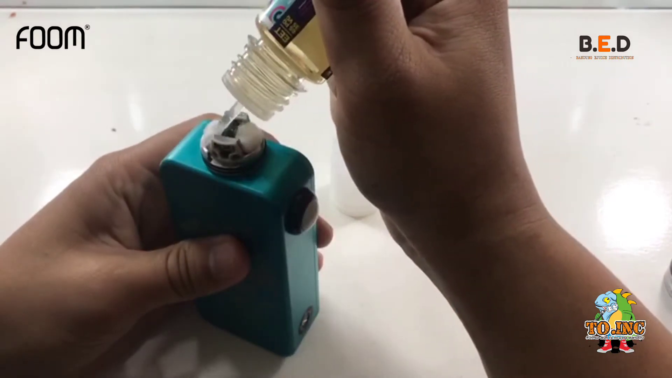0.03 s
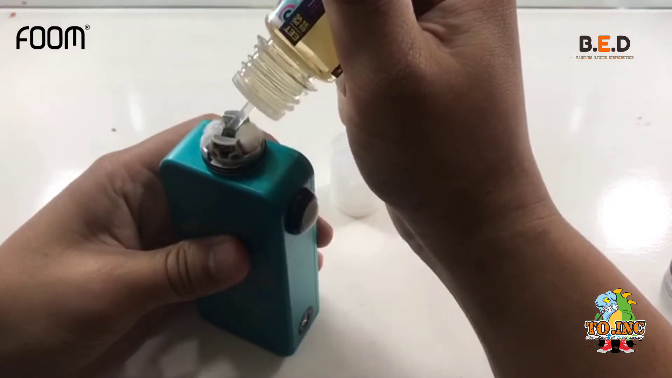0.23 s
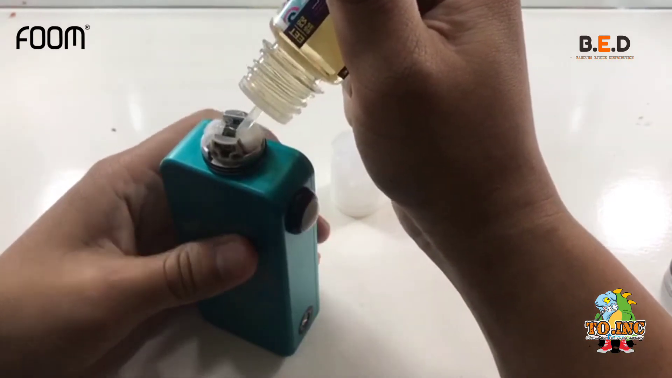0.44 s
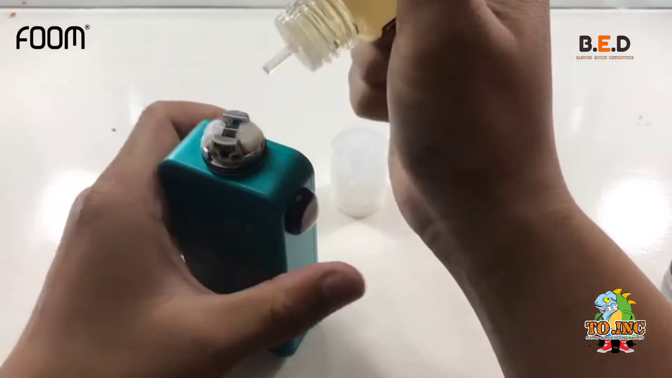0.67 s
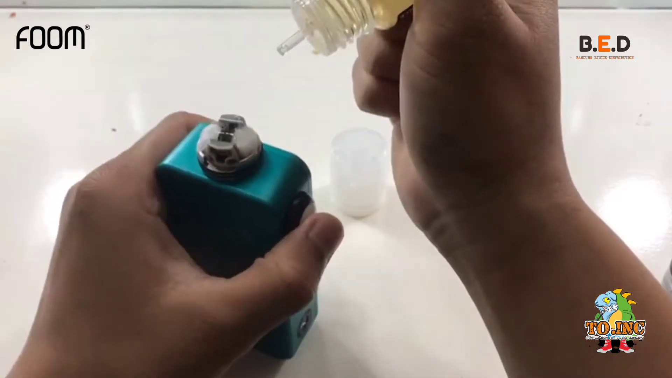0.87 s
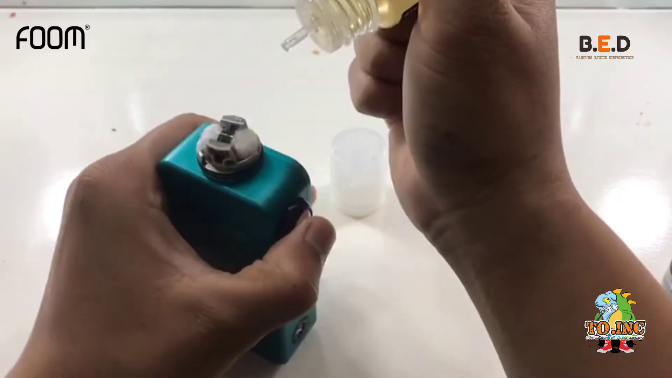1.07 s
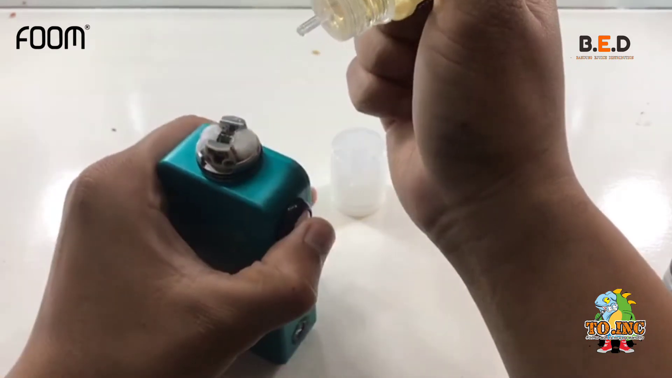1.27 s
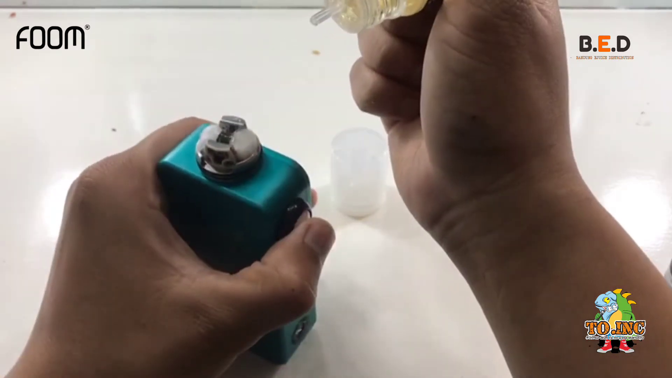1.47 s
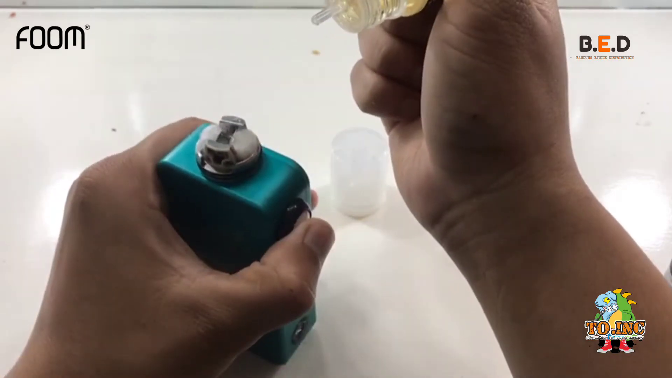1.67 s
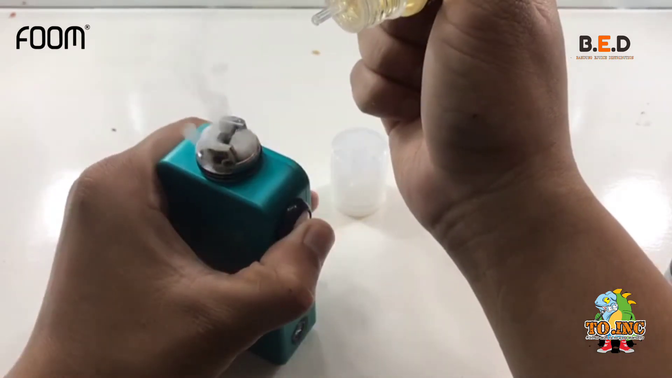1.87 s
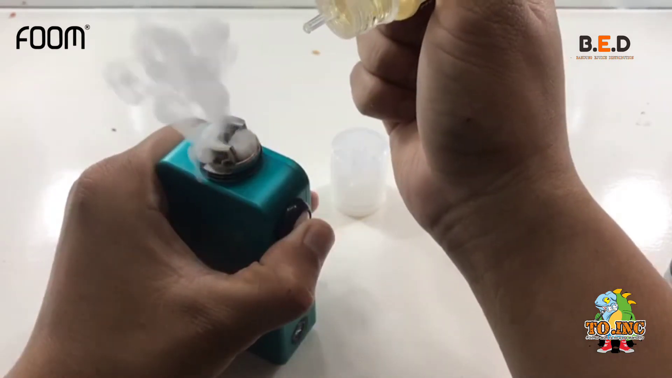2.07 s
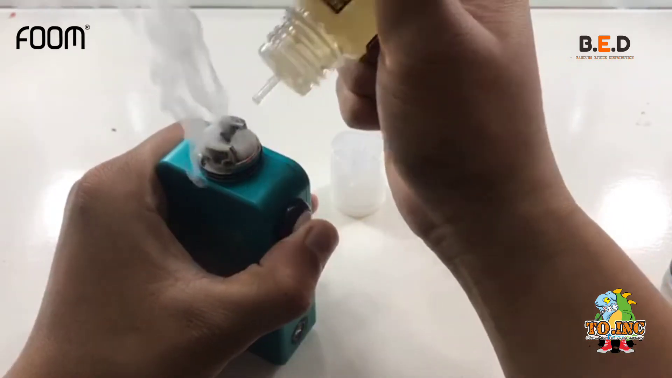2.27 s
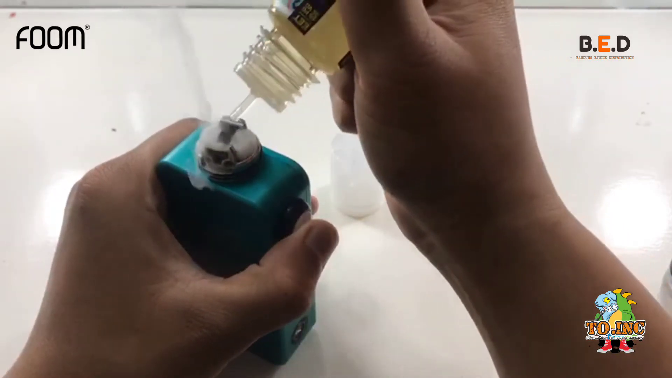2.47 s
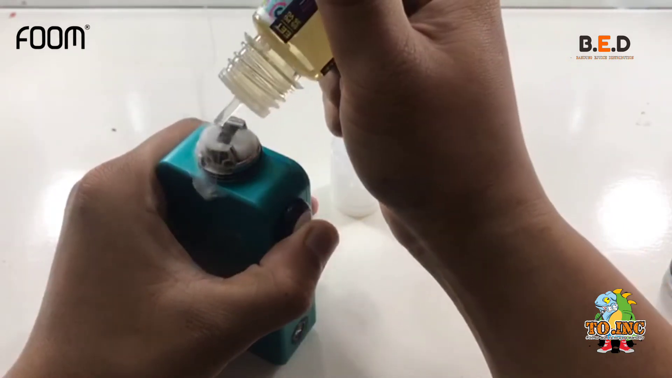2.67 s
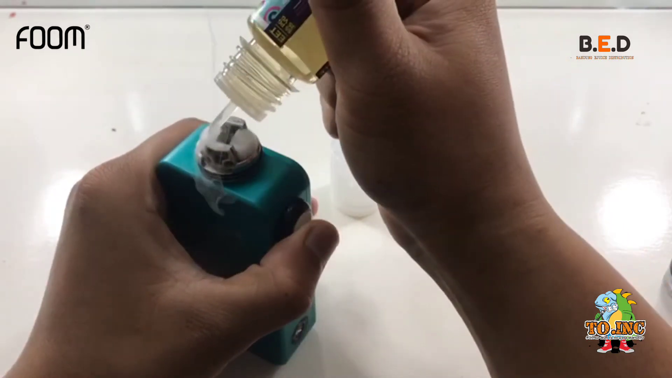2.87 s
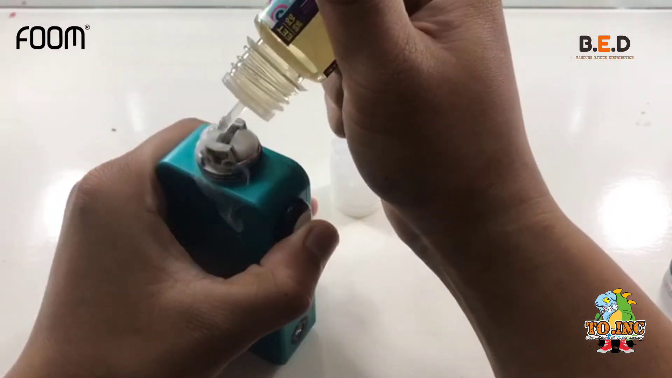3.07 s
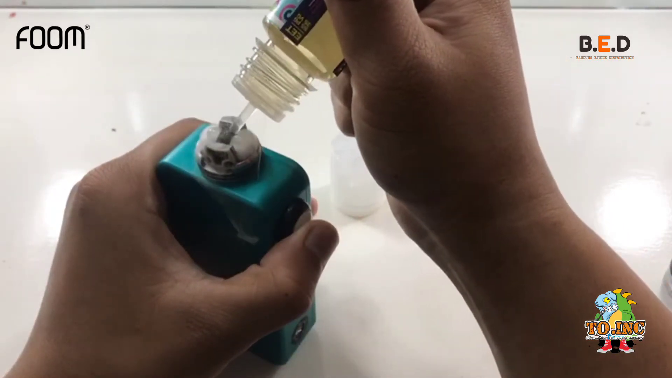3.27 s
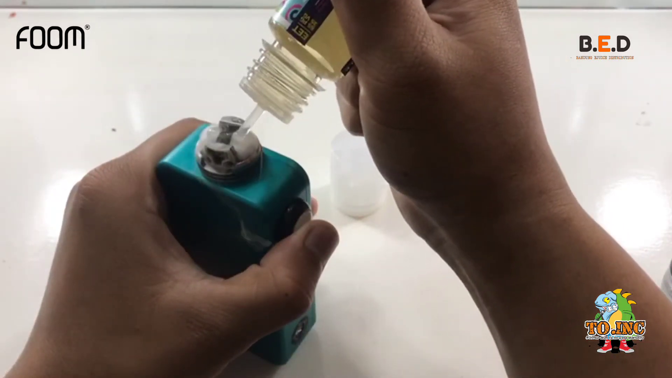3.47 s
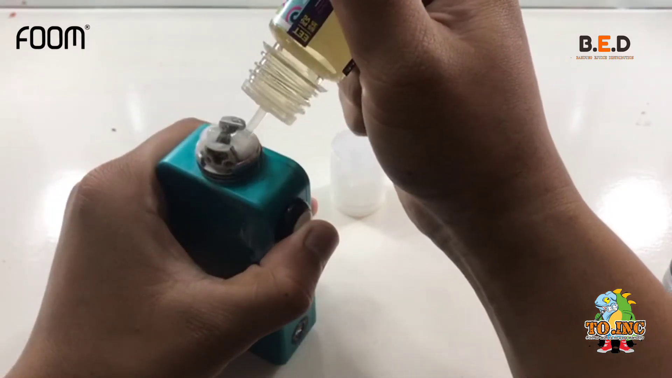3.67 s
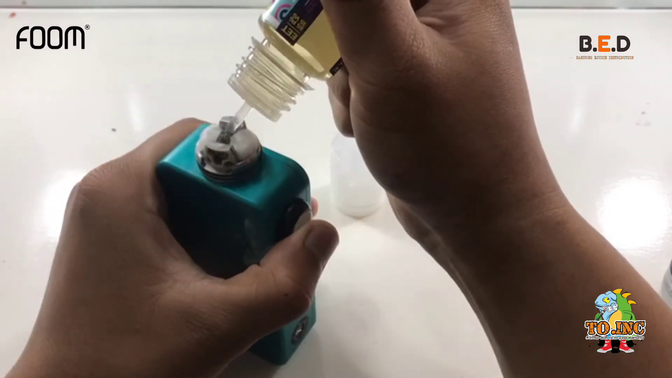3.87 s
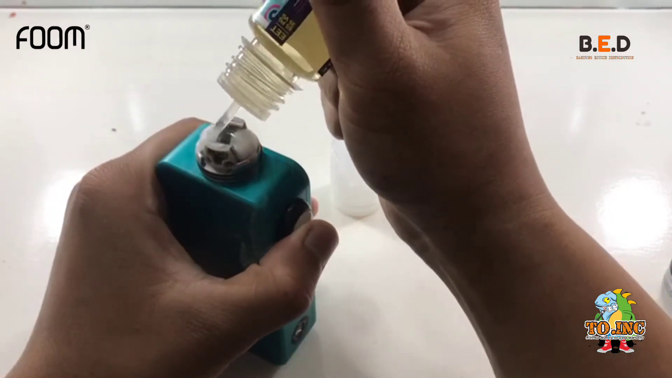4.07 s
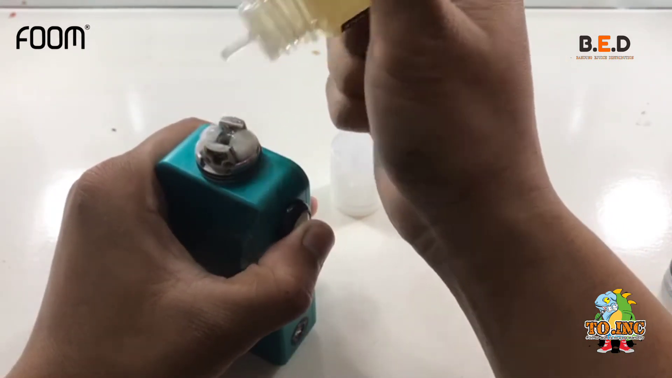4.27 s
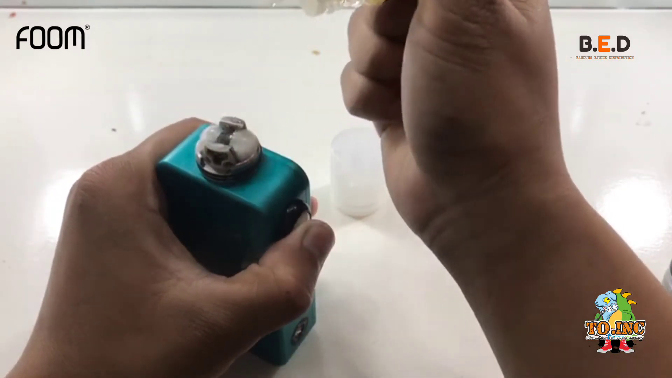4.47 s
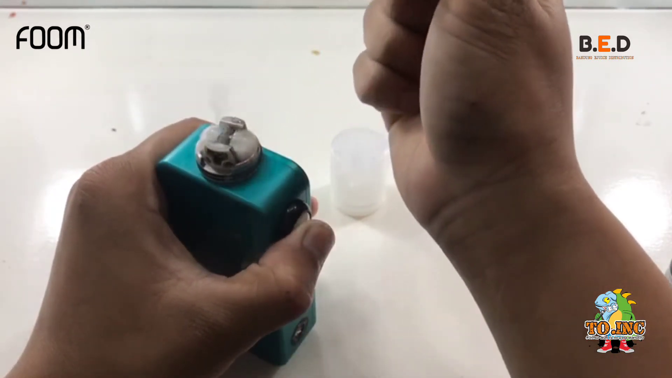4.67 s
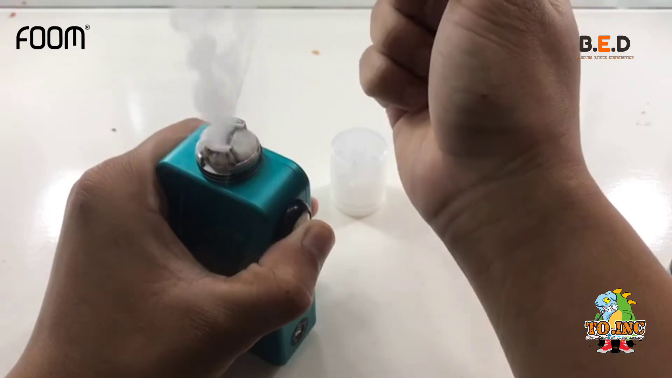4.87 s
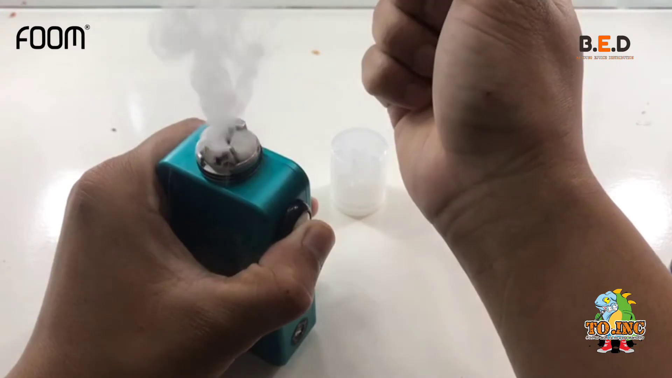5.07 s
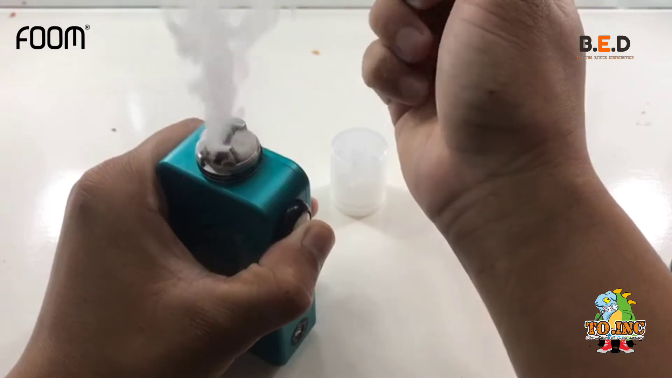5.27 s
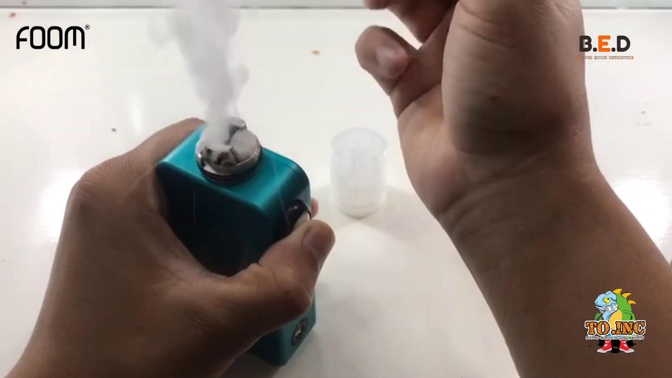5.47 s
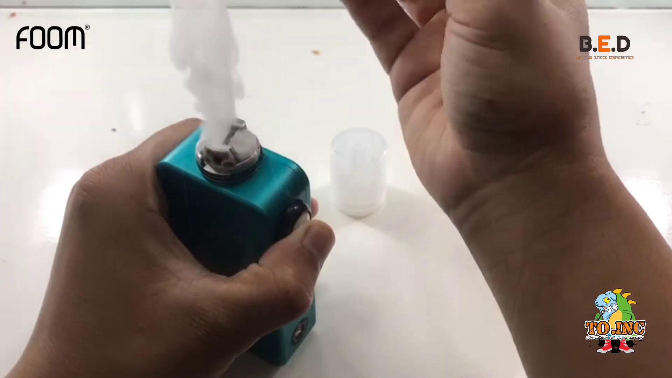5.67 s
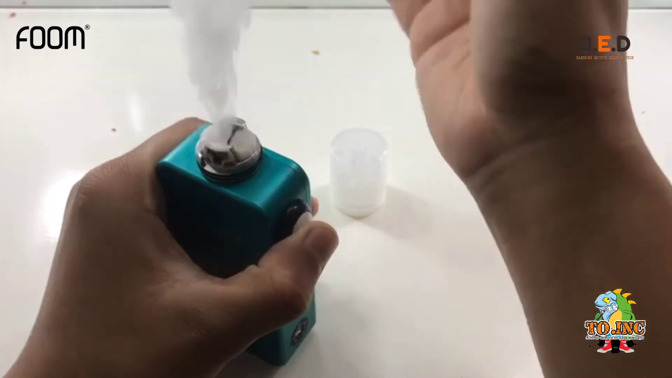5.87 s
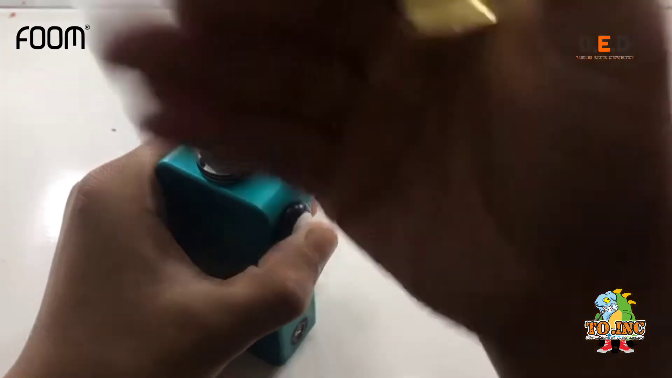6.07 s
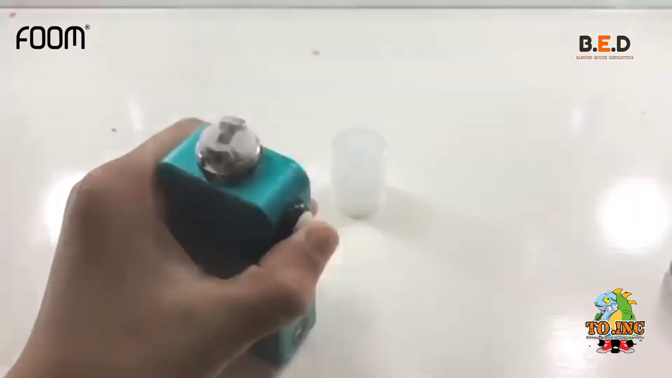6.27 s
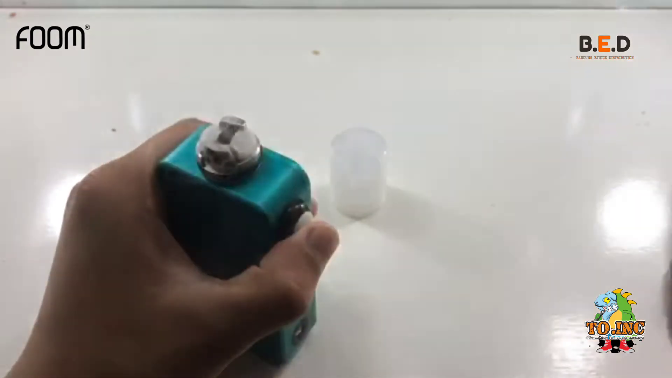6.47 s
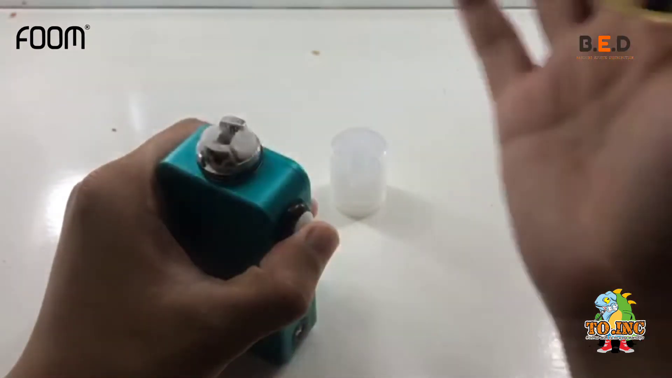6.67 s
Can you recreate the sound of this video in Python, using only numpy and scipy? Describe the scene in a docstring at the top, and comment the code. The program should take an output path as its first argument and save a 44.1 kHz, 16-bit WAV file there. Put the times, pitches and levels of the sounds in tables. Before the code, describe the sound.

A quiet small room with faint, steady low noise, heard close. Around 0.5 s a very light tap touches the table; at 0.85-0.9 s a dull woody knock and smaller bumps follow as the box settles. A tiny high chirp at 0.98 s precedes a crisp, loud metallic button click at 1.02 s. From 1.3 s a barely audible airy hiss grows, with a handful of sharp pops between 2.0 and 2.2 s, when another click ends it. Only room noise remains until a strong click at 4.25 s. At 4.6 s sizzling begins, with scattered pops thickening from 5.0 s into dense, irregular, ringing crackle over a swelling, fuller fizz. It cuts off at about 5.87 s, leaving a short room tail and one weak last tick at 5.95 s. A thin, very faint wavering whistle passes at 6.45-6.7 s.

```python
"""Vaporizer coil fired twice

On a table in a small room the box is nudged and set down, and its button clicks.
The wet coil hisses as it heats: dense random bubbles, coloured by the coil deck. Larger bubbles burst as
sharp ringing pops, a few in the first firing and a dense crackle in the second; echoes throw each back.
Knocks ring table modes, the grip chirps, a faint gliding whistle follows; room tail and noise lie below."""
import sys
import numpy as np
from scipy import signal
from scipy.io import wavfile
from scipy.ndimage import uniform_filter1d

SR = 44100
rng = np.random.default_rng(int(sys.argv[2]) if len(sys.argv) > 2 else 0)


def generate_wav(sig):
    """Save sig (samples, or channels by samples) to the path in sys.argv[1] as 16-bit PCM at SR."""
    pcm = np.round(np.clip(np.atleast_2d(sig).T, -1, 1) * 32767).astype(np.int16)
    wavfile.write(sys.argv[1], SR, pcm)


N = 296352
TAPS = 2048
BINS = np.fft.rfftfreq(TAPS, 1 / SR)


# firings of the coil: (on [s], off [s], first relative level [dB], last relative level [dB],
# first brightness [0-1], last brightness [0-1])
FIRINGS = [(1.297, 2.227, -69.5, -49.5, 0.9, 0.65), (4.58, 5.863, -61, -50.5, 0.66, 0.38)]
# colour of gentle boiling: (frequency [Hz], level [dB])
SIMMER = [(100, -40), (700, -15), (2000, -4), (4000, -1.5), (6000, 1.5), (7000, 0.5), (8400, 5.5),
          (9000, 7), (9600, 10), (10500, 4), (11500, -6.5)]
# colour of full boiling: (frequency [Hz], level [dB])
SIZZLE = [(60, -3), (260, 1), (700, -15), (1200, 0), (2500, -12), (5000, 1), (8000, -2), (11500, -7.5)]


def boiling(per_s=7000, spread_db=2.0, level_db=-0.95, sputter_db=1.0, sputter_per_s=130):
    """Thousands of tiny bubbles a second, in uneven spurts; they grow larger and deeper as the coil heats."""
    t = np.arange(N) / SR
    sizes = amp(spread_db * np.minimum(rng.exponential(1, N), 5)) * rng.choice([-1, 1], N)
    spurts_db = sputter_db * np.interp(t * sputter_per_s, np.arange(N), rng.standard_normal(N))
    sizes *= amp(spurts_db)
    bursting = rng.random(N) < per_s / SR
    bubbles = through(sizes * bursting, nearby())
    small = evened(through(bubbles, pulse(read(SIMMER, BINS) + deck())))
    large = evened(through(bubbles, pulse(read(SIZZLE, BINS) + deck())))
    out = np.zeros(N)
    for firing in FIRINGS:
        gain, bright = heat(t, *firing)
        out += amp(level_db) * gain * (bright * small + (1 - bright) * large)
    return out


def heat(t, on_s, off_s, first_db, last_db, first_bright, last_bright,
         warm_s=0.093, quench_db=12, quench_s=0.035, cool_db_per_s=40):
    """Gain and brightness of the boiling: power ramps both; at power off it drops at once, then dies away."""
    hot = np.clip((t - on_s) / (off_s - on_s), 0, 1)
    cooling_s = np.maximum(t - off_s, 0)
    db = first_db + (last_db - first_db) * hot
    db = db - quench_db * (1 - np.exp(-cooling_s / quench_s)) - cool_db_per_s * cooling_s
    onset = np.clip((t - on_s) / warm_s, 0, 1)
    bright = np.clip(first_bright + (last_bright - first_bright) * hot, 0, 1)
    return amp(db) * onset, bright


# large bubbles that burst as separate pops: (time [s], relative level [dB], bass re middle [dB],
# treble re middle [dB], cavity ring [Hz], ring height [dB])
POPS = [(1.9761, -20.5, 0, 1.5, 2660, 10.5), (2.0473, -19.5, 2, 3, 4150, 6.5),
        (2.0637, -29.5, 4.5, 2, 1700, 13.5), (2.0744, -25, 3, -3, 2970, 8.5), (2.12, -22, 1.5, 0, 5790, 4),
        (2.14, -26.5, 4.5, 2, 2660, 6), (2.182, -24.5, 6, 0, 4990, 3), (2.204, -19, 2.5, 0, 5380, 4.5),
        (4.617, -23, -0.5, -10, 7300, 7), (4.7796, -30, 4, -1, 4900, 5), (4.8014, -23.5, 3, 2.5, 2710, 6.5),
        (4.846, -23.0, 8.5, -1, 4000, 0), (4.8841, -18.5, 11, -3, 6980, 8.5),
        (4.911, -21.5, 8, -4, 2860, 8), (4.9185, -29.5, 5, 2, 4000, 3), (4.9381, -16.5, 0, -2, 3080, 4),
        (4.9811, -24, 3, 0.5, 1690, 10), (5.0138, -10, -3, -5.5, 1690, 2.5),
        (5.0349, -23.5, 0, -7, 1830, 3), (5.0684, -11.5, -2, -0.5, 6480, 2.5),
        (5.1106, -13.5, 2.5, 2, 4470, 7), (5.134, -14.0, -2, -6, 2120, 1),
        (5.148, -14.5, -3, -0.5, 3100, 2), (5.169, -14, -2, -6, 6050, 8), (5.1843, -20.5, 3, -10, 2290, 2),
        (5.2007, -17, 1.5, -5, 5580, 8), (5.219, -14.0, -3, -2.5, 4000, 3.5),
        (5.2485, -16.5, 3, 2, 6750, 6), (5.269, -28, -3, -1, 6480, 5), (5.2804, -15, 4.5, 2.5, 5580, 7),
        (5.3033, -15.0, -2.5, -3, 4990, 5), (5.3216, -15, 0, -4, 2380, 4),
        (5.345, -12, -6, -3.5, 3850, 4.5), (5.3773, -12, -2.5, -3, 2480, 7),
        (5.3961, -11.5, -6.5, -1.5, 2380, 5), (5.4163, -15, -1, -3, 2300, 7),
        (5.4408, -19.0, -6, -2, 2560, 10), (5.4616, -13.5, -3, -3, 2290, 8), (5.485, -20.5, 8, -2, 3440, 6),
        (5.5043, -11.0, -2, 0, 5760, 7), (5.5307, -21.5, 7, 0, 5180, 12), (5.5418, -16.5, 2, -9, 4990, 5),
        (5.5661, -13.5, 3, 2, 4840, 8.5), (5.5809, -28, 3, -10, 2050, -2), (5.5893, -21, 5, -4, 4150, 3),
        (5.5987, -19.5, 0, -9, 4990, 8.5), (5.6264, -12.5, -0.5, -2, 3440, 4.5),
        (5.6478, -18, -2, 1, 2560, 5), (5.6839, -14.5, 1, -3, 7520, 4.5), (5.702, -17.5, 3, -7, 2470, 2),
        (5.7146, -17, -2, -5, 2120, 7), (5.7282, -21.5, 0, -10, 2210, 10),
        (5.7497, -15.5, -1, 0.5, 5580, 3), (5.767, -13.5, -4, -2, 3850, 5), (5.7842, -17.5, 1, -8, 2380, 0),
        (5.8074, -12.5, -4, -11, 10500, 8), (5.8252, -15.5, -2, 2.5, 6900, 5.5),
        (5.8536, -15, 5.5, -0.5, 4150, 7.5), (5.8795, -22.5, 0, -14, 2050, 9.5),
        (5.9524, -35, 14, 4, 3220, 13.5)]
# colour of a burst: (frequency [Hz], level [dB])
BURST = [(60, -29.5), (200, 1), (450, -10.5), (1000, -7.5), (2000, -0.5), (3200, 1), (5200, 5), (6800, 1),
         (9500, 7.5), (11400, -4.5)]


def pops(rows, level_db=-0.36, spray_db=-2, spray_decay_s=0.004, wander_octaves=0.017):
    """Each bubble bursts in a spike ringing its cavity and its spot of the deck, trailed by a little spray."""
    out, paths = np.zeros(N), nearby()
    for s, db, bass_db, treble_db, ring_hz, ring_db in rows:
        spot = deck(2 ** (wander_octaves * rng.standard_normal()))
        colour = read(BURST, BINS) + spot + tilt(bass_db, treble_db) + ringing(ring_hz, ring_db)
        burst = paths + amp(spray_db) * scatter(spray_decay_s)
        add(out, s, amp(db + level_db) * through(burst, pulse(colour)))
    return out


def spits(per_s=20, over_db=20, spread_db=2, treble_db=-8.5, ring_hz=5000, ring_spread_octaves=1.0, ring_db=7):
    """Rows like POPS for small bubbles bursting at random, oftener as the coil heats, at its boiling level."""
    t, rows = np.arange(N) / SR, []
    chance, size, pitch = rng.random(N), rng.standard_normal(N), rng.standard_normal(N)
    for on_s, off_s, *boil in FIRINGS:
        rate_per_s = per_s * (t - on_s) / (off_s - on_s)
        now = (chance < rate_per_s / SR) & (t < off_s)
        gain, _ = heat(t[now], on_s, off_s, *boil)
        levels_db = 20 * np.log10(gain) + over_db + spread_db * size[now]
        rings_hz = ring_hz * 2 ** (ring_spread_octaves * pitch[now])
        rows += [(s, db, 0, treble_db, hz, ring_db) for s, db, hz in zip(t[now], levels_db, rings_hz)]
    return rows


# resonances of the coil deck: (frequency [Hz], width [Hz], height [dB])
DECK = [(641, 312, 10.5), (2000, 110, 3), (2125, 280, -3.5), (2910, 100, 3), (3080, 65, -11.5),
        (3960, 230, -2.5), (3900, 270, -0.5), (4970, 220, -5.5), (5440, 150, -5), (6080, 180, -3.5),
        (7320, 220, 2.5), (8300, 110, 0), (9700, 260, 0.5), (10700, 220, 2), (11180, 300, 5)]


def deck(shift=1):
    """Colour in dB that the metal coil deck gives to bubbles; shift scales its pitch."""
    return resonances(DECK, shift)


# echoes from the box, the hands and the table: (delay [ms], gain [ratio])
ECHOES = [(.66, -.2), (.94, -.25), (1.58, .3), (1.87, .12), (2.18, .13), (2.45, -.18), (3.6, .14),
          (7.97, .1)]


def nearby():
    """The direct path and its first echoes."""
    paths = np.zeros(TAPS)
    paths[0] = 1
    for ms, gain in ECHOES:
        paths[round(ms * SR / 1000)] += gain
    return paths


# fire button, pressed and let go: (time [s], level [dB], bass re middle [dB], treble re middle [dB],
# strongest ring [Hz], ring height [dB])
BUTTON = [(1.0191, -5.5, -6, 2.5, 8800, 4), (2.209, -9, 15, 0, 11600, 13.5),
          (4.2495, -5, -11, 8.5, 7600, -0.5)]
# colour of the snap: (frequency [Hz], level [dB])
SNAP = [(100, -26), (1500, -20), (2500, -23), (3400, -8.5), (4300, -9), (5500, 1), (7000, 1), (8800, 0.5),
        (10300, -0.5), (11300, -7), (11900, -16)]
# resonances of the switch's metal spring: (frequency [Hz], width [Hz], height [dB])
SPRING = [(3380, 380, 7.5), (4400, 170, -6), (5100, 580, 2.5), (6000, 320, -13), (6960, 250, 11),
          (8900, 590, 4.5), (10800, 350, 5), (11300, 260, 11)]


def button(lead_s=0.0005, lead_db=-11, rattle_db=-1, rattle_decay_s=0.0031, room_db=-11, room_low_hz=4500):
    """The switch gives way, snaps on its stop and rattles; its treble leaves an even hiss in the room."""
    out, radiated = np.zeros(N), np.zeros(N)
    for s, db, bass_db, treble_db, ring_hz, ring_db in BUTTON:
        colour = read(SNAP, BINS) + tilt(bass_db, treble_db)
        snap = pulse(colour + resonances(SPRING) + ringing(ring_hz, ring_db))
        plain = pulse(colour)
        click = snap + amp(rattle_db) * through(scatter(rattle_decay_s), snap)
        click *= amp(db) / np.linalg.norm(click)
        add(out, s - lead_s, amp(lead_db) * click)  # giving way
        add(out, s, click)
        add(radiated, s, amp(db + room_db) * plain / np.linalg.norm(plain))
    treble = signal.lfilter(*signal.butter(2, room_low_hz, "highpass", fs=SR), radiated)
    return out + room(treble)


# the box meets the table, rocks and settles: (time [s], relative thud level [dB],
# relative tick level [dB], top of the blow's range [Hz], decay constant under the pressing hand [s])
KNOCKS = [(0.5136, -41.5, -33.5, 280, 0.11), (0.532, -38.5, -40, 180, 0.5), (0.854, -20, -34, 440, 0.03),
          (0.8744, -32, -46, 484, 0.046), (0.911, -28, -42, 220, 0.052), (0.98, -40.5, -60, 280, 0.066),
          (1.0098, -33.5, -33, 160, 0.15), (4.255, -56.5, -60, 600, 0.1)]
# modes of the table: (frequency [Hz], relative level [dB], t60 [s])
TABLE = [(107, -20, 0.25), (136.4, -12.5, 0.12), (168.2, -9, 0.41), (219.4, 5, 0.051), (266.3, 4, 0.053),
         (338, -8.5, 0.11), (423, -10, 0.11), (546, -15, 0.108), (650, -11, 0.062), (815, -9, 0.059),
         (990, -9.5, 0.08), (1370, 3.5, 0.027), (1467, 11.5, 0.016), (1730, 2, 0.027)]
# colour of the contact tick: (frequency [Hz], level [dB])
TICK = [(100, 0), (800, 15.5), (1500, 6), (3000, 9), (5500, 6), (8000, -1.5), (11500, 3)]


def knocks(rise_s=0.0038, tick_decay_s=0.0067, table_low_hz=105):
    """Blows ring the table modes up to each blow's top frequency; the box's hard corner adds a tick."""
    out, t, ring = np.zeros(N), np.arange(SR // 2) / SR, 0
    for hz, db, t60_s in TABLE:
        ring = ring + amp(db) * np.exp(-np.log(1000) * t / t60_s) * np.sin(2 * np.pi * hz * t)
    ring *= 1 - np.exp(-t / rise_s)
    for s, thud_db, tick_db, top_hz, damp_s in KNOCKS:
        thud = signal.lfilter(*signal.butter(2, top_hz, fs=SR), ring * np.exp(-t / damp_s))
        tick = through(scatter(tick_decay_s), pulse(read(TICK, BINS)))
        add(out, s, -amp(thud_db) * thud)
        add(out, s, amp(tick_db) * tick)
    # the table top hardly radiates below table_low_hz
    return signal.sosfilt(signal.butter(2, table_low_hz, "highpass", fs=SR, output="sos"), out)


# pitch and level of the chirp: (time [s], pitch [Hz], level [dB])
CHIRP = [(0.976, 4030, -72), (0.982, 4110, -56), (0.988, 4120, -51), (0.996, 4030, -72)]


def grip_chirp():
    """A short squeak as the grip shifts: a gliding tone and its octave."""
    return squeak(CHIRP, partial_ratio=2, partial_db=-8)


# pitch and level of the whistle: (time [s], pitch [Hz], level [dB])
WHISTLE = [(6.44, 9350, -85), (6.46, 9550, -73), (6.485, 10150, -75), (6.51, 10300, -62),
           (6.535, 10270, -60), (6.56, 10120, -77), (6.585, 9300, -77), (6.605, 9300, -70),
           (6.635, 9650, -77), (6.665, 9200, -70), (6.71, 8870, -84)]


def whistle():
    """A thin, faint tone that wavers and falls, with a weaker partial below it."""
    return squeak(WHISTLE, partial_ratio=0.7, partial_db=-11)


def squeak(curve, partial_ratio, partial_db):
    """A thin gliding tone with one weaker partial."""
    t = np.arange(N) / SR
    s, hz, db = np.transpose(curve)
    angle = 2 * np.pi * np.cumsum(np.interp(t, s, hz)) / SR
    gain = amp(np.interp(t, s, db)) * (t > s[0]) * (t < s[-1])
    return gain * (np.sin(angle) + amp(partial_db) * np.sin(partial_ratio * angle))


# decay of the room: (frequency [Hz], t60 [s])
ROOM = [(150, 0.59), (500, 0.3), (2000, 0.54), (6000, 0.31), (11000, 0.28)]


def room(x, build_s=0.0041):
    """A diffuse tail of energy 1 in which each band dies at its own speed."""
    hz, t, z = signal.stft(rng.standard_normal(SR // 2), SR, nperseg=256)
    decay = np.exp(-np.log(1000) * t / read(ROOM, hz)[:, None])
    tail = signal.istft(z * decay, SR)[1]
    tail *= 1 - np.exp(-np.arange(len(tail)) / SR / build_s)
    return through(x, tail / np.linalg.norm(tail))


# colour of the room noise: (frequency [Hz], relative density [dB per Hz])
AIR = [(12, -41), (20, -0.5), (48, -9.5), (96, -5.5), (143, -8.5), (237, -7), (278, -13.5), (363, -6.5),
       (499, -10.5), (634, -7), (970, -11), (1840, -13), (2150, -11), (3570, -20), (11500, -24.5),
       (15000, -72), (22000, -120)]


def air(level_db=-63, patchy_db=1.56):
    """Steady room noise that drifts a little in time-frequency patches."""
    hz, t, z = signal.stft(rng.standard_normal(N), SR, nperseg=2048)
    patches = uniform_filter1d(rng.standard_normal(z.shape), size=12, axis=0)
    patches = evened(uniform_filter1d(patches, size=5, axis=1))
    shaped = z * amp(read(AIR, hz)[:, None] + patchy_db * patches)
    return amp(level_db) * evened(signal.istft(shaped, SR)[1][:N])


def resonances(table, shift=1):
    """The peaks and dips, in dB, that a metal part gives to a sound; shift scales their pitch."""
    return sum(db * np.exp(-2 * ((BINS - hz * shift) / width) ** 2) for hz, width, db in table)


def ringing(hz, db, width_octaves=0.27):
    """One broad, quickly damped resonance, in dB."""
    return db * np.exp(-(np.log2((BINS + 1) / hz) / width_octaves) ** 2)


def tilt(bass_db, treble_db):
    """Raises or lowers bass and treble around the middle band."""
    return read([(400, 0), (1400, bass_db), (1900, bass_db), (3800, 0), (5800, 0), (8500, treble_db)], BINS)


def scatter(decay_s):
    """A dense, quickly dying noise cluster of energy 1."""
    cluster = rng.standard_normal(TAPS) * np.exp(-np.arange(TAPS) / SR / decay_s)
    return cluster / np.linalg.norm(cluster)


def pulse(colour_db):
    """The shortest causal pulse with this colour (minimum phase)."""
    log_gain = np.log(amp(np.r_[colour_db, colour_db[-2:0:-1]]))
    return np.fft.ifft(np.exp(signal.hilbert(log_gain).conj())).real


def through(x, response):
    """Passes a sound through an impulse response."""
    return signal.oaconvolve(x, response)[:len(x)]


def add(mix, s, sound):
    """Mixes a sound in at time s."""
    part = mix[round(s * SR):][:len(sound)]
    part += sound[:len(part)]


def read(points, hz):
    """Joins (Hz, value) points on a log-frequency axis."""
    f, value = np.transpose(points)
    return np.interp(np.log(hz + 1), np.log(f + 1), value)


def evened(x):
    """Scales to rms 1."""
    return x / np.sqrt(np.mean(x ** 2) + 1e-20)


def amp(db):
    """Decibels to gain."""
    return 10 ** (np.asarray(db) / 20)


def scene(coil_room_db=-10.5, table_room_db=-11.5):
    """Coil, button and table share one room."""
    coil = boiling() + pops(POPS + spits())
    clicks, table = button(), knocks()
    squeaks = grip_chirp() + whistle()
    wet = amp(coil_room_db) * room(coil) + amp(table_room_db) * room(table)
    return (coil + clicks + table + squeaks + wet + air())[None]


def record(dry, edge_hz=11850):
    """Limits the band with a steep linear-phase low-pass."""
    lowpass = signal.firwin(201, edge_hz, window=("kaiser", 8), fs=SR)
    return signal.oaconvolve(dry, lowpass[None], "same")


dry = scene()
out = record(dry)
generate_wav(out)
```